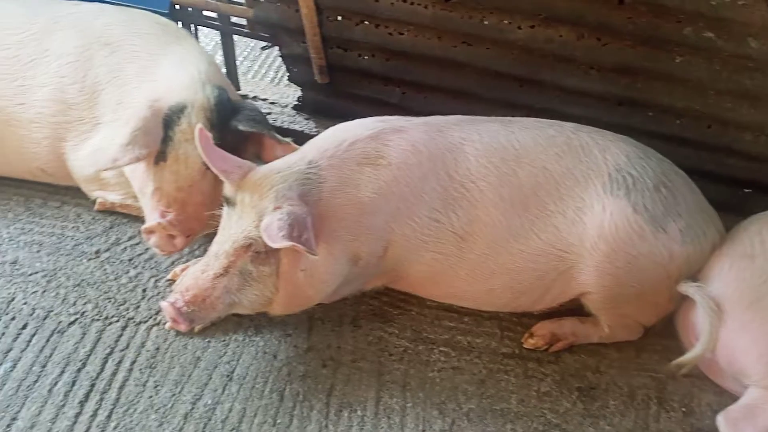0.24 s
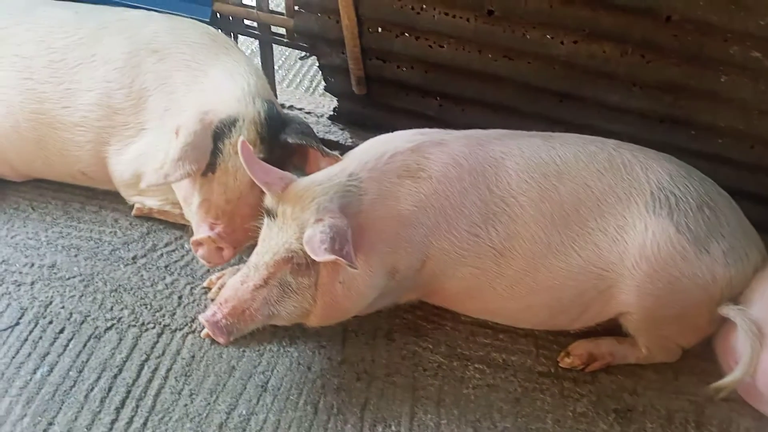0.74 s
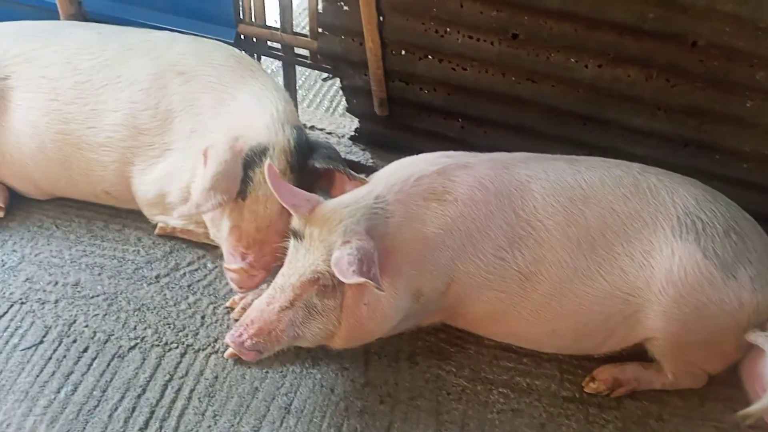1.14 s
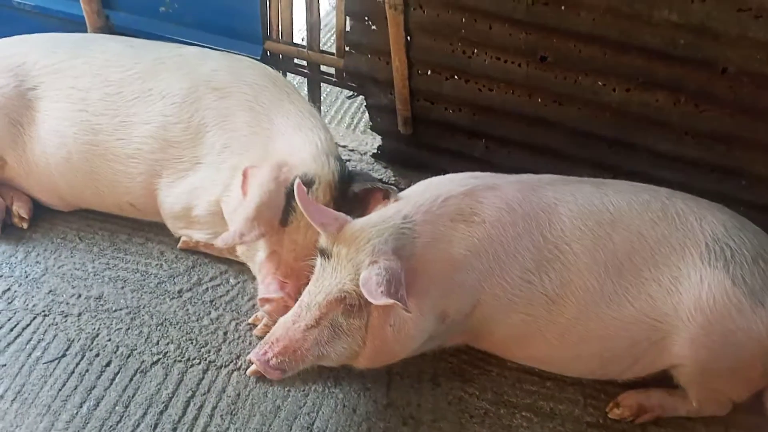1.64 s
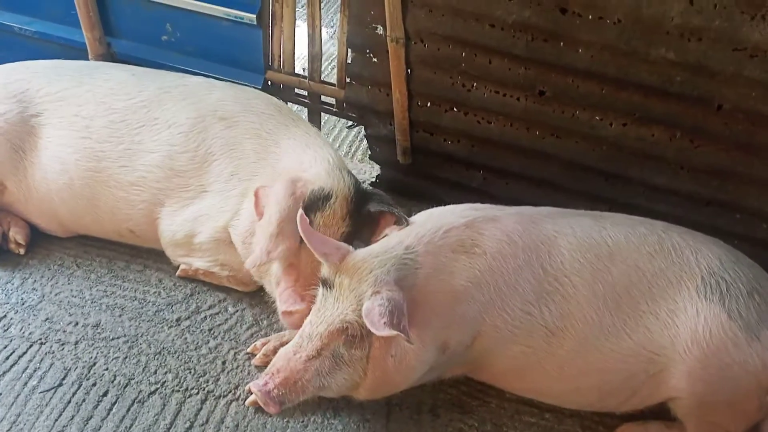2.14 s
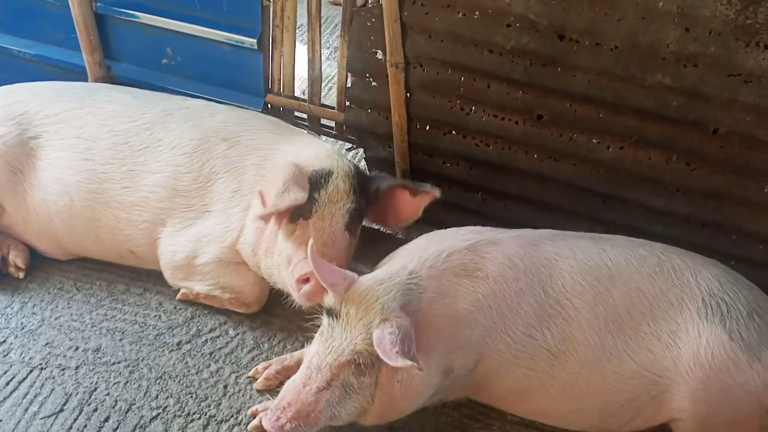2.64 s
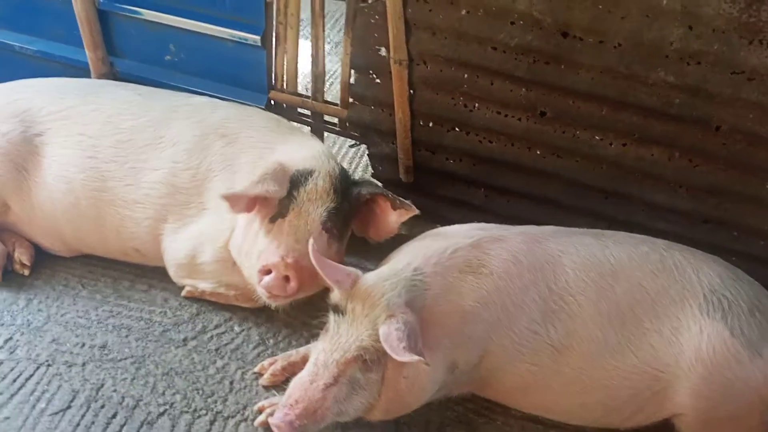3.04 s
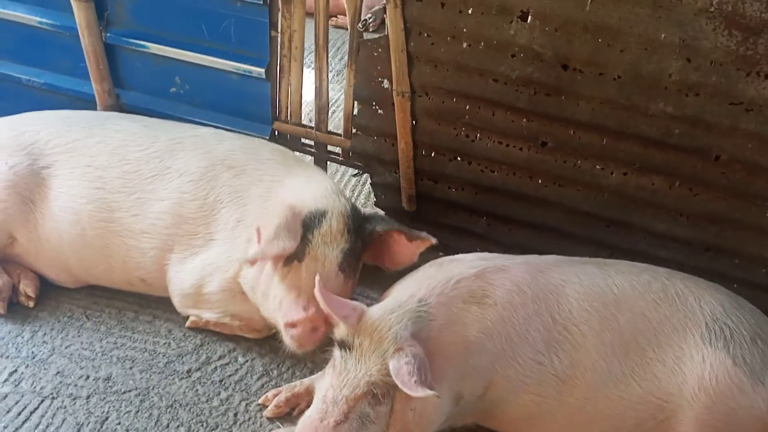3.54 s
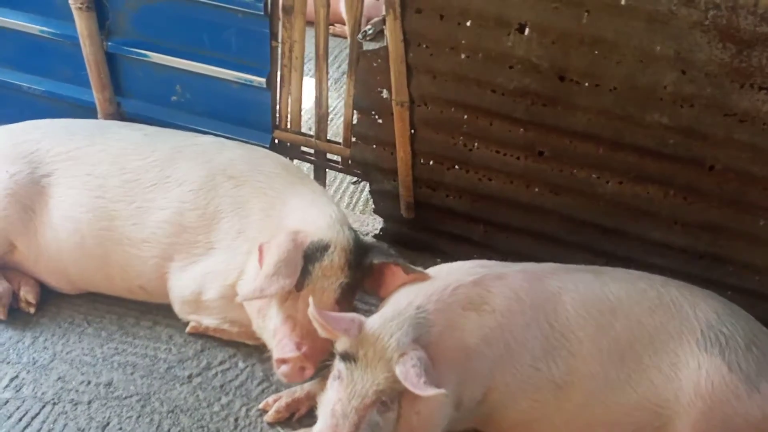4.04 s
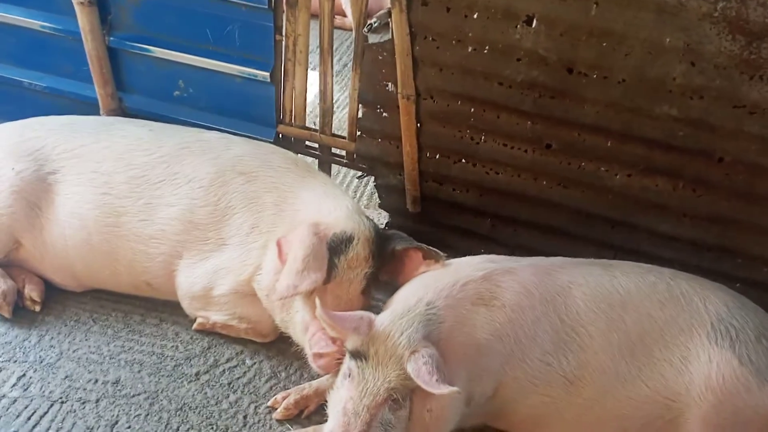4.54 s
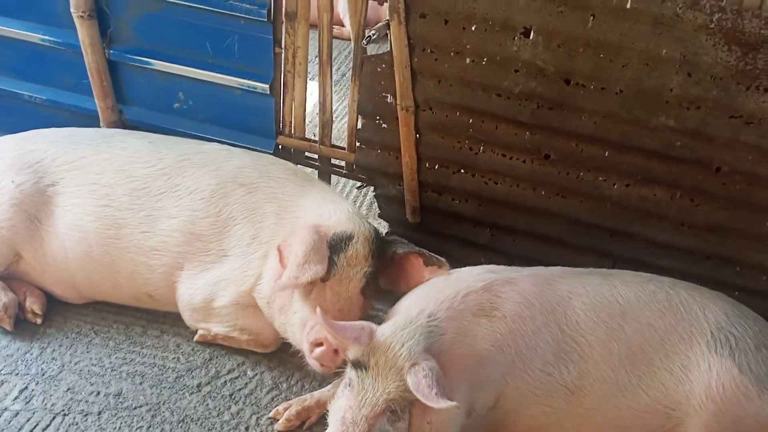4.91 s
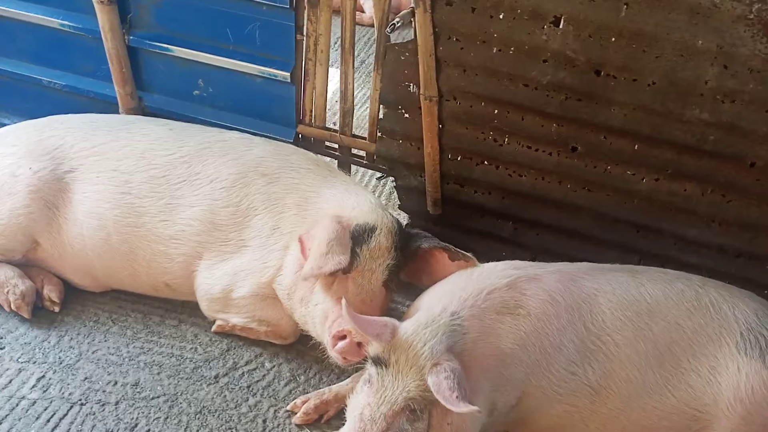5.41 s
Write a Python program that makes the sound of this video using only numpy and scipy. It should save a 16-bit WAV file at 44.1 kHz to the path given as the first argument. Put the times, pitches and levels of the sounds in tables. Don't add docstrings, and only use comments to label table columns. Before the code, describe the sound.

Two young pigs grunt back and forth in a small tin and concrete pen. The farther one starts with a breathy, nasal buzz; the nearer answers with short bursts of hard, wet slaps over a low hum. Faint wheezes and snorts, thin bird whistles, distant moans and a low engine swell sit behind. A small camera microphone catches it from close by.

```python
import sys
import numpy as np
from scipy import signal
from scipy.io import wavfile
from scipy.ndimage import uniform_filter1d, minimum_filter1d

SR = 44100
rng = np.random.default_rng(int(sys.argv[2]) if len(sys.argv) > 2 else 0)


def to_wav(s):
    ch = np.atleast_2d(s).T
    pcm = np.round(np.clip(ch, -1, 1) * 32767)
    wavfile.write(sys.argv[1], SR, pcm.astype(np.int16))


def volts_from_db(level):
    exponent = np.asarray(level, float) / 20
    return 10 ** exponent


N = 250047
CHEST_HZ = 178

# start_s, snout_db,
# thump_db, brightness_db_per_octave
SLAPS = [
    [(0.5232, -20.5, -31, 1), (0.5546, -7.5, -18, -6.5), (0.59, -9.5, -15.5, -4.5),
     (0.6014, -20.5, -14, 10), (0.621, -12, -17, 7.5), (0.6334, -32, -17, 18)],
    [(1.022, -36, -38, 8), (1.063, -14, -24.5, -6), (1.096, -27, -19, 11), (1.128, -12, -23.5, -8)],
    [(1.416, -17.5, -49, -4.5), (1.423, -43, -37.5, 12)],
    [(2.6464, -23, -35, 3), (2.6643, -12.5, -30, 3), (2.6888, -3, -22.5, 3), (2.7182, -3, -17, -2),
     (2.7364, -14, -28.5, 4)],
    [(3.5194, -6.5, -17, -1), (3.5558, -11, -17, 5.5), (3.5705, -20, -25.5, 4), (3.5894, -44, -27.5, 0.1)],
    [(4.5216, -25, -28.5, 10), (4.558, -18, -25.5, 17), (4.5805, -12.5, -25.5, -1)],
    [(4.8509, -29, -54, -10), (4.8723, -10.5, -29, -4), (4.8988, -6.5, -22.5, -6.5),
     (4.9324, -14, -26, -12), (4.9614, -19.5, -26, 4.5)],
]
# centre_hz, width_hz, level_db
SNOUTS = [
    [(1070, 140, -9), (1416, 66, 3), (1754, 104, 10), (2180, 120, -3.5), (3050, 270, -7.5),
     (3880, 126, -10.5)],
    [(1460, 85, -7), (1870, 230, -6.5), (2274, 110, -2), (3830, 250, -20), (4400, 580, -17)],
    [(330, 160, 2), (750, 220, 11), (1300, 230, 10), (1670, 500, 3), (3020, 900, -17)],
    [(1444, 130, -0.5), (1824, 160, -2), (2280, 120, 4.5), (2550, 320, -7.5), (3950, 200, -11),
     (4480, 220, -17), (5700, 300, -33)],
    [(1435, 37, 7), (1760, 92, 5), (2085, 120, 0), (2870, 230, -6.5), (3375, 370, -11), (3920, 170, -9.5)],
    [(1305, 120, -5), (1820, 86, 1), (2202, 58, -2), (2500, 140, -11.5), (4260, 280, -46)],
    [(1377, 51, -2.5), (1806, 88, -4), (2286, 195, -4), (3210, 280, -6), (3760, 290, -13),
     (4410, 380, -14.5), (6060, 580, -19)],
]
# centre_hz, width_hz, level_db
CHEST_MODES = [(82.5, 78, -5.5), (188, 90, 2), (302, 94, -0.5), (451, 100, -7.5), (700, 135, -10)]
SPIT_DB = [-51, -55, -47, -55, -42.5, -66, -66]
SAG_PER_S = [0.12, 0.1, 0.1, 0.091, 0.27, 0.27, 1.5]
SPIT_DB_PER_SLAP_DB = 0.6
LEAK_DB = -7
OPEN_S, SHUT_S, SHUT_DB = 0.0007, 0.007, -13
RUSH_DB, RUSH_WIDER = -10.5, 3.2
WALL_S, WALL_DB = 0.0118, -11


def palate_slap(modes):
    after_s = np.arange(3000) / SR
    click = puff(decay_s=0.004, rough=0.045, throb=0)
    ring = steep_tract(click, modes) + volts_from_db(LEAK_DB) * tract(click, modes)
    ring *= np.minimum(after_s / OPEN_S, 1)
    ring *= volts_from_db(SHUT_DB * np.clip((after_s - SHUT_S) / 0.0012, 0, 1))
    open_modes = [(hz, RUSH_WIDER * width_hz, db) for hz, width_hz, db in modes]
    rush = steep_tract(puff(decay_s=0.013, rough=1, throb=0.9), open_modes)
    rush *= np.minimum(after_s / SHUT_S, 1)
    return peaked(ring) + volts_from_db(RUSH_DB) * peaked(rush)


def near_pig():
    out, spit = np.zeros(N), np.zeros(N)
    after_s = np.arange(3000) / SR
    for slaps, snout, wet_db, sag in zip(SLAPS, SNOUTS, SPIT_DB, SAG_PER_S):
        middle_s = np.mean([row[0] for row in slaps])
        lowest_hz, highest_hz = snout[0][0], snout[-1][0]
        for start_s, snout_db, thump_db, bright_db in slaps:
            modes = []
            for hz, width_hz, db in snout:
                sinking_hz = hz * (hz / lowest_hz) ** (-sag * (start_s + after_s - middle_s))
                modes.append((sinking_hz, width_hz, db + bright_db * np.log2(hz / 1800)))
            slap = dulled(palate_slap(modes), 1.2 * highest_hz)
            add(out, start_s, volts_from_db(snout_db - 2) * peaked(slap))
            thump = dulled(tract(puff(decay_s=0.0094, rough=0.097, throb=0), CHEST_MODES), 1500)
            add(out, start_s, volts_from_db(thump_db + 1.67) * peaked(thump))
            spit_db = wet_db + SPIT_DB_PER_SLAP_DB * snout_db + 13
            add(spit, start_s, volts_from_db(spit_db) * peaked(puff(decay_s=0.003, rough=0.6, throb=0.9)))
    add(out, WALL_S, volts_from_db(WALL_DB) * out)
    spit_highpass = signal.butter(4, 6300, "high", fs=SR, output="sos")
    return out + chest_hum() + signal.sosfilt(spit_highpass, spit)


# start_s, top_s, end_s, pitch_hz, level_db
HUMS = [(.518, 0.538, 0.64, 182.4, -37), (.55, 0.554, 0.64, 188, -26), (.58, 0.605, 0.69, 177, -31),
        (1.01, 1.025, 1, 183, -36.5), (1.035, 1.062, 1.11, 178, -29.5), (1.09, 1.1, 1.22, 179.4, -26),
        (1.118, 1.136, 1.19, 176, -26), (2.645, 2.667, 2.77, 174, -29.5), (2.685, 2.69, 2.81, 177.5, -32.5),
        (2.71, 2.73, 2.78, 175, -30), (3.513, 3.519, 3.55, 253, -27), (3.551, 3.562, 3.68, 268, -30),
        (4.506, 4.534, 4.65, 251.2, -31), (4.835, 4.879, 4.97, 189, -31.5),
        (4.915, 4.937, 5.01, 190.5, -23.5), (4.935, 4.963, 5.005, 181.4, -23.5)]
HUM_DEPTH_DB, HUM_ROUND, HUM_WAVER_HZ = 24, 1.8, 8


def chest_hum():
    out = np.zeros(N)
    for start_s, top_s, end_s, pitch_hz, level_db in HUMS:
        t, shape_db = swell(start_s, top_s, end_s, HUM_DEPTH_DB, HUM_ROUND)
        hz = pitch_hz + HUM_WAVER_HZ * drift(len(t), span_s=0.012)
        hum = np.sqrt(2) * np.sin(2 * np.pi * np.cumsum(hz) / SR)
        add(out, start_s, volts_from_db(level_db + shape_db) * hum * signal.windows.tukey(len(t), 0.2))
    return out


# start_s, top_s, end_s, effort_db, nasal_ring_db
FAR = [
    (0.138, 0.18, .33, -23.5, -28),
    (1.04, 1.177, 1.29, -21, -27),
    (1.67, 1.724, 1.89, -22.5, -26),
    (2.166, 2.244, 2.37, -30.5, -37.5),
    (2.829, 2.916, 3.01, -25, -40),
    (3.346, 3.43, 3.57, -24, -32),
    (4.249, 4.36, 4.52, -20.5, -26),
    (5.446, 5.518, 5.66, -24, -28),
]
# breath_0_to_1, mouth_factor (on throat_hz), flat_top_exponent
FAR_VOICE = [(1, 1.018, 1.27), (1, 0.978, 2.37), (1, 0.98, 1.55), (0.64, 1.04, 1.7), (1, 1.03, 2.36),
             (0.67, 1.017, 1.56), (0.97, 0.996, 1.54), (0.51, 1.005, 1.63)]
# pulse_s, pulses_per_s
FAR_BEAT = [(.161, 41.8), (1.0865, 43.5), (1.6927, 42), (2.1945, 42), (2.8625, 41.8), (3.4015, 40.5),
            (4.306, 45), (5.474, 41.8)]
# centre_hz, width_hz, level_db
FAR_THROAT = [(269, 94, -10), (571, 38.5, -5.5), (791, 78, -6), (1114, 73, -3), (1676, 196, -4.5),
              (2083, 161, 3), (2375, 393, -5), (2900, 113, -8.5), (3310, 163, -14.5), (3863, 120, -24.5)]
FAR_DEPTH_DB, FAR_TOP_HZ = 29, 4540
GROWL_HZ, GROWL_WIDTH_HZ, GROWL_DB = 279, 235, -17.5
NASAL_HZ, NASAL_WIDTH_HZ = 1124, 58
NASAL_PER_EFFORT, NASAL_LAG_S = 1.9, 0.004


def far_pig():
    out = np.zeros(N)
    waver_hz = 8 * drift(N, span_s=0.008)
    for grunt, voice, (pulse_s, pulses_per_s) in zip(FAR, FAR_VOICE, FAR_BEAT):
        *times_s, top_db, ring_db = grunt
        breath, mouth, flat = voice
        t, shape_db = swell(*times_s, FAR_DEPTH_DB, flat)
        nasal_db = ring_db + NASAL_PER_EFFORT * np.interp(t - NASAL_LAG_S, t, shape_db)
        since_s = (t - pulse_s) * pulses_per_s % 1 / pulses_per_s
        effort_db = np.interp(t - 0.42 * since_s + 0.01, t, top_db + shape_db)
        click = 5 * (since_s < 1 / SR)
        air = (breath + np.exp(-since_s / 0.0028)) * rng.standard_normal(len(t)) + click
        modes = [(hz * mouth, width_hz, db) for hz, width_hz, db in FAR_THROAT]
        growl = resonate(resonate(click, GROWL_HZ, GROWL_WIDTH_HZ), GROWL_HZ, GROWL_WIDTH_HZ)
        throat = evened(tract(air, modes)) + volts_from_db(GROWL_DB) * evened(growl)
        nose_hz = NASAL_HZ + waver_hz[(t * SR).astype(int)]
        ring = resonate(resonate(air, nose_hz, NASAL_WIDTH_HZ), nose_hz, 2 * NASAL_WIDTH_HZ)
        sound = volts_from_db(effort_db) * throat + volts_from_db(nasal_db + 1) * evened(ring)
        add(out, t[0], sound * signal.windows.tukey(len(t), 0.1))
    return dulled(out, FAR_TOP_HZ)


# start_s, top_s, end_s, level_db
SNORTS = [
    (0.484, 0.696, .8, -70),
    (0.817, 0.825, .88, -73),
    (1.415, 1.417, 1.56, -59.5),
    (2.672, 2.673, 2.73, -67.5),
    (2.71, 2.714, 2.76, -79),
    (3.518, 3.516, 3.556, -59.5),
    (3.56, 3.546, 3.63, -60),
]
# freq_hz, level_db_per_hz
SNORT_SPECTRUM = [(140, -54), (230, 5), (284, -3), (351, -9.5), (975, -12), (1440, -6.5), (1710, -9),
                  (2010, -4.5), (6090, -24), (8220, -15), (10200, -37), (15500, -36)]
SNORT_DEPTH_DB, SNORT_ROUND = 18.5, 1.7


def snorts():
    out, hiss = np.zeros(N), noise(SNORT_SPECTRUM, patchy_db=0.7)
    for *times_s, level_db in SNORTS:
        t, shape_db = swell(*times_s, SNORT_DEPTH_DB, SNORT_ROUND)
        air = hiss[round(t[0] * SR):][:len(t)]
        add(out, t[0], volts_from_db(level_db + shape_db + 26) * air * signal.windows.tukey(len(t), 0.02))
    return out


# start_s, top_s, end_s, centre_hz, level_db
WHEEZES = [(0.028, 0.047, .13, 3220, -46), (0.46, 0.45, .54, 3230, -47), (0.9, 0.82, 1.05, 3200, -46.5),
           (1.356, 1.407, 1.425, 3320, -49), (2.513, 2.52, 2.64, 3160, -48.5),
           (5.32, 5.36, 5.4, 3650, -54.5), (3.7, 3.76, 3.93, 4530, -53), (3.78, 3.88, 4.0, 5100, -54.5),
           (1.9, 1.95, 2.02, 4470, -54)]
WHEEZE_WIDTH_HZ, WHEEZE_DEPTH_DB = 490, 8


def wheezes():
    out = np.zeros(N)
    for *times_s, hz, level_db in WHEEZES:
        t, shape_db = swell(*times_s, WHEEZE_DEPTH_DB, 2)
        air = resonate(resonate(rng.standard_normal(len(t)), hz, WHEEZE_WIDTH_HZ), hz, WHEEZE_WIDTH_HZ)
        add(out, t[0], volts_from_db(level_db + shape_db) * evened(air) * signal.windows.tukey(len(t), 0.3))
    return out


# start_s, length_s, start_hz, end_hz, level_db
WHISTLES = [(0, .06, 4550, 4650, -57), (.03, .07, 5000, 5000, -61), (.385, .125, 4460, 4450, -59),
            (.66, .1, 4700, 5100, -67), (1.1, .1, 4700, 5200, -61), (1.62, .1, 4450, 4500, -60),
            (1.7, .08, 4750, 4850, -66), (1.9, .1, 4150, 4600, -57), (1.94, .07, 4150, 4300, -60),
            (2.3, .07, 4350, 4500, -57), (2.345, .07, 5000, 4980, -61), (2.92, .09, 4650, 4700, -56),
            (3.11, .095, 4400, 4480, -61), (3.75, .09, 4380, 4600, -56), (3.81, .07, 5000, 5050, -63),
            (3.85, .07, 4500, 4800, -62), (3.96, .11, 4520, 4700, -57), (4.175, .055, 4320, 4420, -58),
            (4.52, .05, 4400, 4400, -60), (4.585, .095, 4170, 3900, -55), (4.69, .08, 4300, 4500, -59),
            (4.77, .06, 4800, 5050, -62), (5.14, .07, 4400, 4400, -59), (5.2, .04, 4600, 4750, -65),
            (5.24, .05, 3620, 3480, -61), (4.23, .04, 4700, 5000, -61), (2.36, .1, 4780, 4740, -63),
            (2.92, .05, 4350, 4350, -62)]
# start_s, level_db, start_hz, end_hz, length_s
CHIRPS = [
    (3.188, -43, 7750, 4900, .034),
    (3.695, -44, 7600, 4500, .04),
    (4.367, -43, 7500, 5000, .034),
    (4.859, -44, 7250, 7100, .012),
]


def birds():
    out = np.zeros(N)
    quaver_hz = 60 * drift(N, span_s=0.002)
    flutter_db = 3 * drift(N, span_s=0.005)
    for start_s, length_s, start_hz, end_hz, level_db in WHISTLES:
        at = round(start_s * SR) + np.arange(round(length_s * SR))
        hz = np.linspace(start_hz, end_hz, len(at)) + quaver_hz[at]
        tone = np.sin(2 * np.pi * np.cumsum(hz) / SR) * signal.windows.tukey(len(at), 0.35)
        add(out, start_s, volts_from_db(level_db + 4.5 + flutter_db[at]) * tone)
    for start_s, level_db, start_hz, end_hz, length_s in CHIRPS:
        u = np.linspace(0, 1, round(length_s * SR))
        hz = start_hz + (end_hz - start_hz) * u ** 0.9
        tone = np.sin(2 * np.pi * np.cumsum(hz) / SR)
        add(out, start_s, volts_from_db(level_db - 14 * u) * tone * signal.windows.tukey(len(u), 0.2))
    return out


# start_s, top_s, end_s, pitch_hz, level_db
MOANS = [
    (1.959, 2.053, 2.14, 635, -56.5),
    (2.129, 2.189, 2.22, 590, -48),
    (2.294, 2.376, 2.39, 660, -55),
    (2.385, 2.434, 2.53, 496, -50.5),
    (1.492, 1.52, 1.55, 684, -52),
    (1.564, 1.572, 1.635, 608, -55),
    (5.217, 5.273, 5.36, 298, -56),
    (5.347, 5.37, 5.44, 960, -57.5),
]
MOAN_WIDTH_HZ, MOAN_DEPTH_DB = 35, 21


def moans():
    out = np.zeros(N)
    for *times_s, hz, level_db in MOANS:
        t, shape_db = swell(*times_s, MOAN_DEPTH_DB, 1.3)
        moan = evened(resonate(rng.standard_normal(len(t)), hz, MOAN_WIDTH_HZ))
        add(out, t[0], volts_from_db(level_db + shape_db + 5) * moan * signal.windows.tukey(len(t), 0.3))
    return dulled(out, FAR_TOP_HZ)


# time_s, firings_per_s, level_db, best_order, fall_db_per_order
ENGINE = [(0, 28.4, -59, 2.2, 10), (.8, 28.4, -68, 4, 0.5), (1.6, 38.6, -52, 2.1, 11),
          (2.2, 35.6, -51.5, 2.6, 18), (2.55, 34, -52, 4, 11), (2.85, 32.5, -47.5, 3.5, 2.5),
          (3.19, 29.3, -34, 3.6, 20.5), (3.45, 30.3, -41.5, 3.1, 14), (3.8, 29, -53.5, 3.7, 11),
          (4.1, 26.5, -44.5, 3.3, 14), (4.38, 29, -41, 3, 19), (4.5, 33, -63, 3, 5),
          (4.7, 27.3, -46, 3.2, 13.5), (5.1, 27.8, -46, 3.5, 4), (5.4, 29.13, -53, 4, 2.5),
          (5.67, 28.5, -47.5, 3.7, 4)]
ORDER_FLOOR_DB = -31


def engine():
    time_s, *curves = np.transpose(ENGINE)
    t = np.arange(time_s[0], time_s[-1], 1 / SR)
    firings_per_s, level_db, best_order, fall_db = [np.interp(t, time_s, curve) for curve in curves]
    phase = 2 * np.pi * np.cumsum(firings_per_s) / SR
    out = np.zeros(N)
    for k in range(5):
        order = k + 2
        order_db = np.maximum(-fall_db * abs(order - best_order), ORDER_FLOOR_DB - 2 * k)
        waver_db = 2.2 * drift(len(t), span_s=0.06)
        tone = np.sqrt(2) * np.sin(order * phase + 1.3 * k * k)
        add(out, t[0], volts_from_db(level_db + order_db + waver_db) * tone)
    return out


# top_s, half_length_s, snouts_db, chests_db
HERD = [(0.673, 0.13, -25, -25.5), (1.088, 0.077, -24, -54), (1.306, 0.18, -28, -34.5),
        (1.82, 0.18, -28.5, -65.5), (2.057, 0.14, -44, -36.5), (2.238, 0.16, -26.5, -25),
        (2.486, 0.16, -40, -41), (2.838, 0.064, -40, -28), (3.678, 0.14, -34.5, -33.5),
        (3.866, 0.2, -31.5, -38), (4.42, 0.13, -25, -45), (4.563, 0.1, -23, -44), (5.037, 0.2, -42, -70),
        (5.425, 0.1, -36, -47), (5.512, 0.09, -38, -22.5)]
HERD_DEPTH_DB = 21
SNOUTS_BED_DB, CHESTS_BED_DB = -41, -57


def herd():
    snouts_gain, chests_gain = np.full(N, volts_from_db(SNOUTS_BED_DB)), np.full(N, volts_from_db(CHESTS_BED_DB))
    for top_s, half_s, snouts_db, chests_db in HERD:
        t, shape_db = swell(top_s - half_s, top_s, top_s + half_s, HERD_DEPTH_DB, 0.86)
        fade = signal.windows.tukey(len(t), 0.3)
        add(snouts_gain, t[0], volts_from_db(snouts_db + shape_db) * fade)
        add(chests_gain, t[0], volts_from_db(chests_db + shape_db) * fade)
    out = np.zeros(N)
    for hz, width_hz, gain in [(1807, 970, snouts_gain), (485, 550, chests_gain)]:
        breath = resonate(resonate(rng.standard_normal(N), hz, width_hz), hz, width_hz)
        out += volts_from_db(-13) * gain * evened(breath)
    return out


# freq_hz, level_db_per_hz
YARD = [(18, -41), (30, -58), (81, 6), (127, -0.5), (231, -3.5), (351, -7), (577, -6.5), (924, -9),
        (1730, -3), (4560, -15), (5920, -23), (6580, -24), (8330, -16), (10800, -37), (15600, -35.5)]


def yard():
    return volts_from_db(-46) * noise(YARD, patchy_db=0.6)


# freq_hz, t60_s
PEN = [(150, 0.034), (600, 0.26), (2000, 0.19), (5000, 0.36), (12000, 0.027)]


def pen(x):
    taps = np.zeros(SR // 2)
    at = np.arange(200, SR // 2 - 20, 20)
    taps[at + rng.integers(0, 20, len(at))] = rng.choice([-1., 1.], len(at))
    hz, t, z = signal.stft(taps, SR, nperseg=256)
    decay_db = -60 * t / read(PEN, hz)[:, None]
    tail = signal.istft(z * volts_from_db(decay_db), SR, nperseg=256)[1]
    return signal.fftconvolve(x, tail / np.linalg.norm(tail))[:N]


def puff(decay_s, rough, throb):
    t = np.arange(3000) / SR
    burst = rough * rng.standard_normal(3000) * np.exp(-t / decay_s)
    burst *= 1 + throb * np.cos(2 * np.pi * CHEST_HZ * t)
    burst[0] += 1
    return burst


def resonate(x, hz, width_hz):
    turn = np.exp(2j * np.pi * np.cumsum(hz * np.ones(len(x))) / SR)
    r = np.exp(-np.pi * width_hz / SR)
    return 2 * (turn * signal.lfilter([1 - r], [1, -r], x / turn + 1e-18)).real


def tract(x, modes):
    return sum((-1) ** k * volts_from_db(db) * resonate(x, hz, width_hz)
               for k, (hz, width_hz, db) in enumerate(modes))


def steep_tract(x, modes):
    return sum((-1) ** k * volts_from_db(db) * resonate(resonate(x, hz, 1.22 * width_hz), hz, 1.24 * width_hz)
               for k, (hz, width_hz, db) in enumerate(modes))


def dulled(x, hz):
    return signal.sosfilt(signal.butter(4, hz, fs=SR, output="sos"), x)


def noise(spectrum, patchy_db):
    hz = np.fft.rfftfreq(1024, 1 / SR)
    real, imag, patches = rng.standard_normal((N // 256 + 5, 513, 3)).T
    patches = uniform_filter1d(patches, size=10, axis=0)
    patches = evened(uniform_filter1d(patches, size=12, axis=1))
    z = (real + 1j * imag) * volts_from_db(read(spectrum, hz)[:, None] + patchy_db * patches)
    return evened(signal.istft(z, nperseg=1024, noverlap=768)[1][:N])


def swell(start_s, top_s, end_s, depth_db, roundness):
    t = np.arange(start_s, end_s, 1 / SR)
    return t, -depth_db * np.interp(t, [start_s, top_s, end_s], [1, 0, 1]) ** roundness


def drift(count, span_s):
    size = round(span_s * SR)
    wander = uniform_filter1d(rng.standard_normal(N), size=size)
    return evened(uniform_filter1d(wander, size=size)[:count])


def read(points, hz):
    f, value = np.transpose(points)
    return np.interp(np.log(hz + 1), np.log(f + 1), value)


def evened(x):
    return x / np.sqrt(np.mean(x ** 2) + 1e-20)


def peaked(x):
    return x / abs(x).max()


def add(mix, start_s, sound):
    part = mix[round(start_s * SR):][:len(sound)]
    part += sound[:len(part)]


def scene():
    near, far, air, song = near_pig(), far_pig() + moans(), snorts() + wheezes(), birds()
    echoes = pen(volts_from_db(-8) * near + volts_from_db(-6) * far + volts_from_db(-13.5) * air + volts_from_db(-7) * song)
    return (near + far + air + song + echoes + engine() + herd() + yard())[None]


def limited(x):
    ceiling = 0.4
    peak = -minimum_filter1d(-abs(x), size=201)
    return x * uniform_filter1d(ceiling / np.maximum(peak, ceiling), size=201)


def top_cut(x):
    return signal.sosfilt(signal.butter(12, 16120, fs=SR, output="sos"), x)


def record(dry):
    lowpass = signal.firwin(401, 15650, window=("kaiser", 9), fs=SR)
    band = signal.oaconvolve(limited(dry), lowpass[None], "same")
    highpass = signal.butter(3, 48, "high", fs=SR, output="sos")
    return top_cut(signal.sosfilt(highpass, band))


dry = scene()
out = record(dry)
to_wav(out)
```